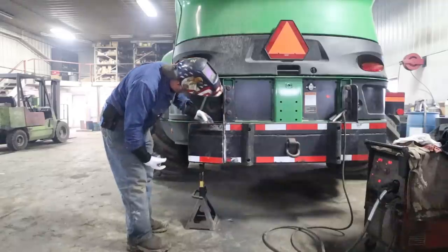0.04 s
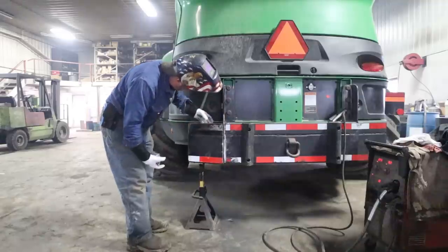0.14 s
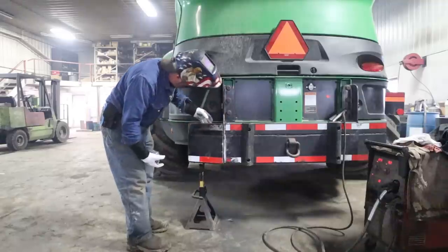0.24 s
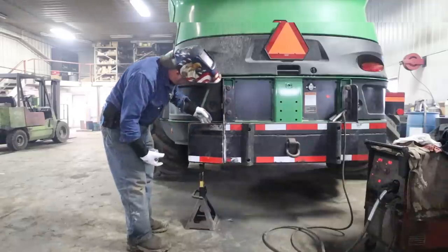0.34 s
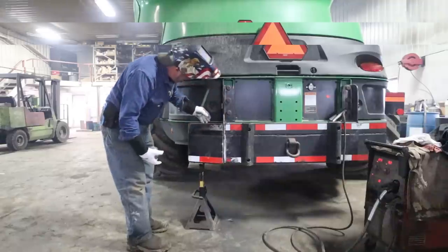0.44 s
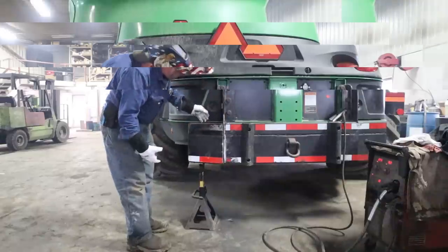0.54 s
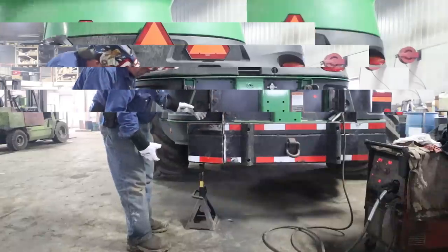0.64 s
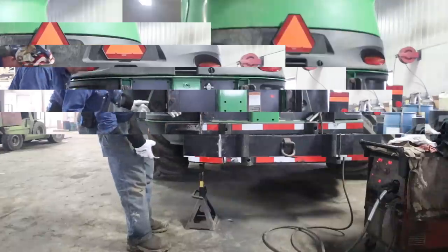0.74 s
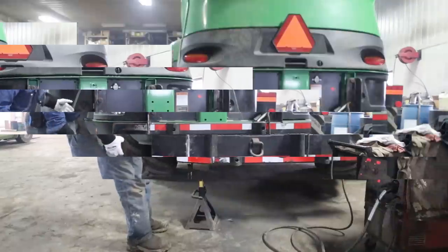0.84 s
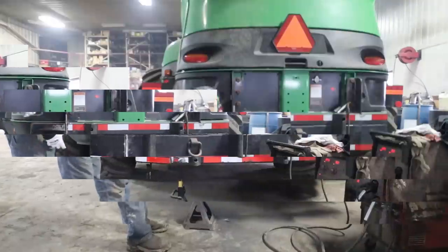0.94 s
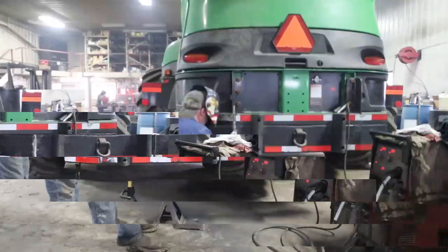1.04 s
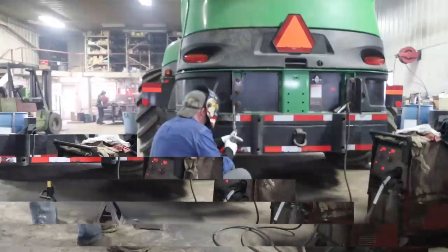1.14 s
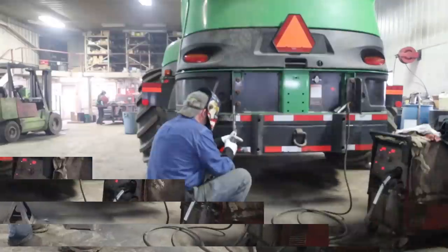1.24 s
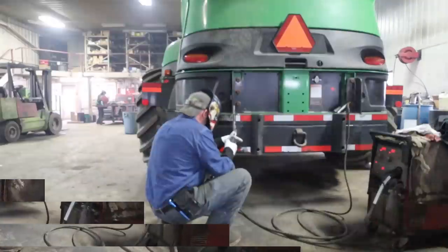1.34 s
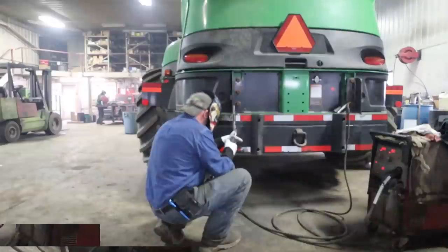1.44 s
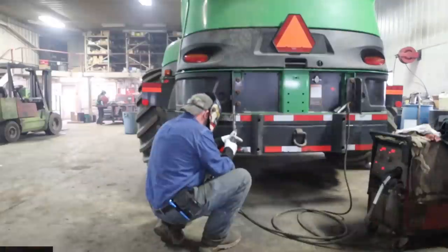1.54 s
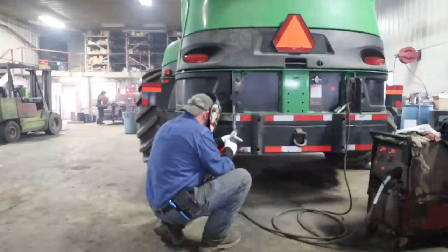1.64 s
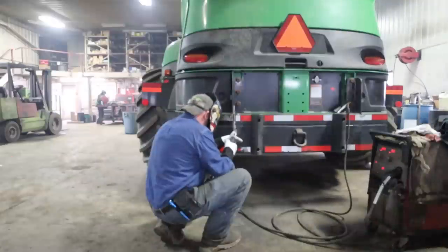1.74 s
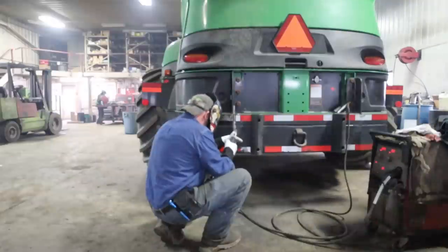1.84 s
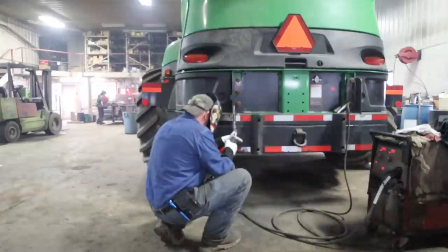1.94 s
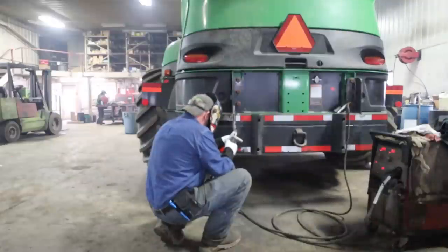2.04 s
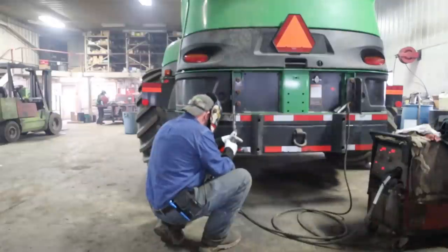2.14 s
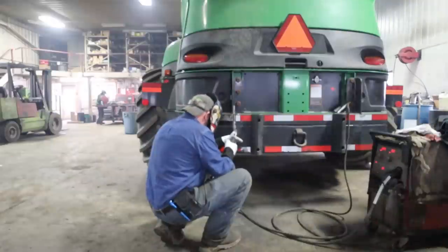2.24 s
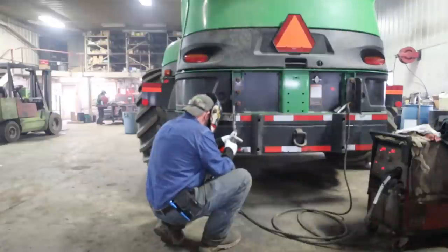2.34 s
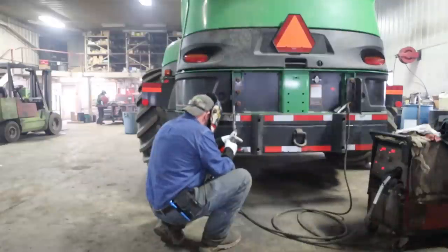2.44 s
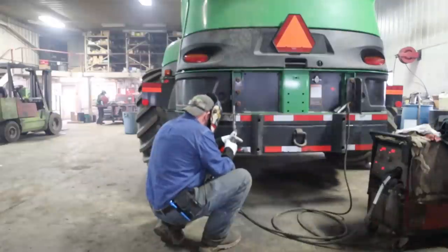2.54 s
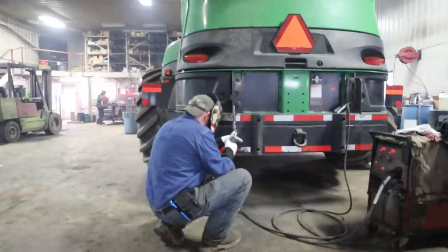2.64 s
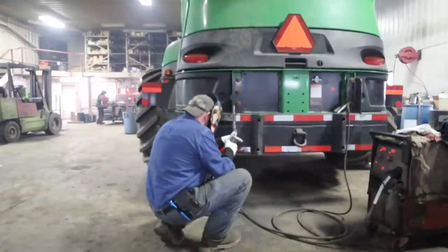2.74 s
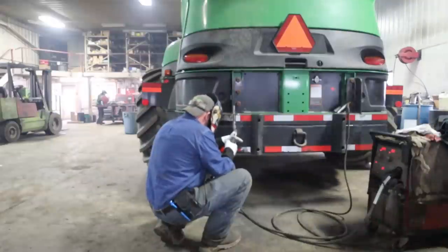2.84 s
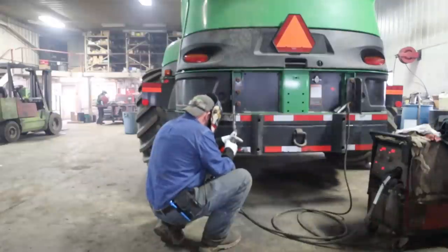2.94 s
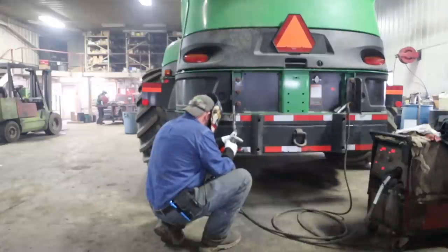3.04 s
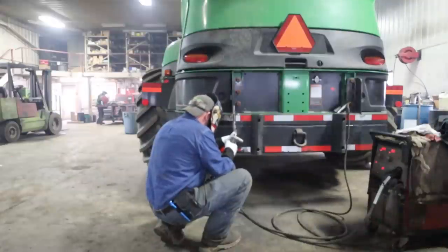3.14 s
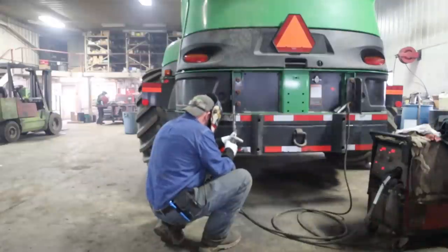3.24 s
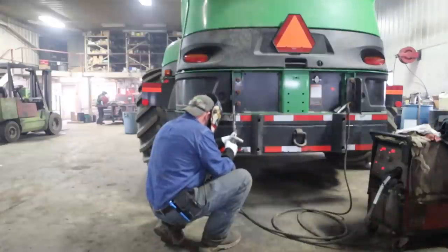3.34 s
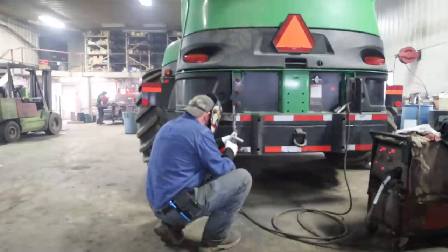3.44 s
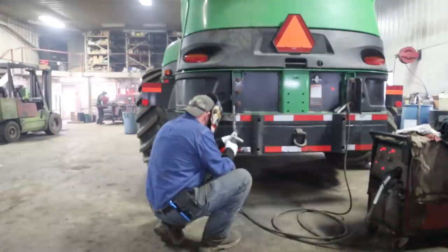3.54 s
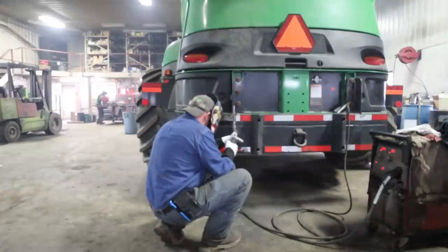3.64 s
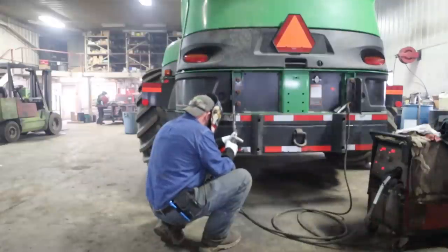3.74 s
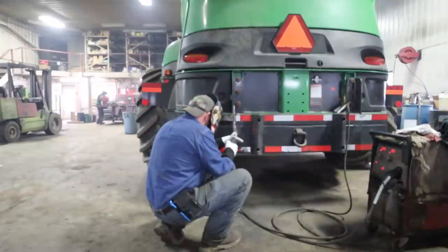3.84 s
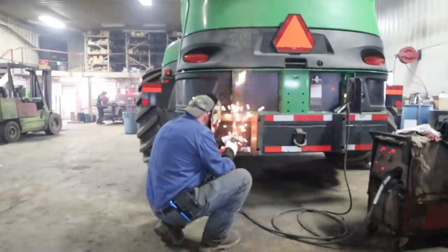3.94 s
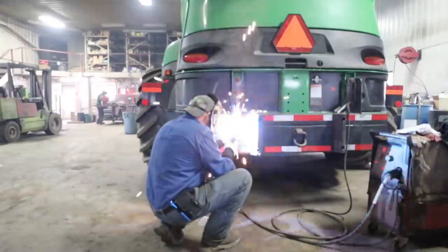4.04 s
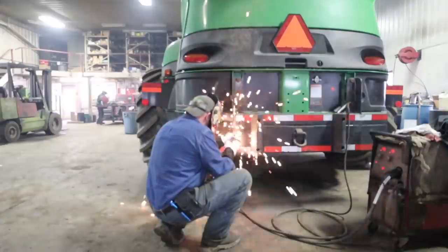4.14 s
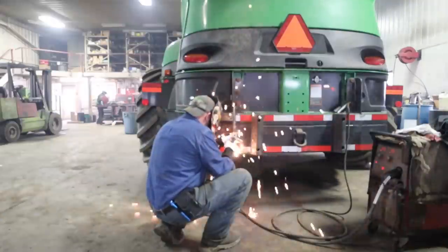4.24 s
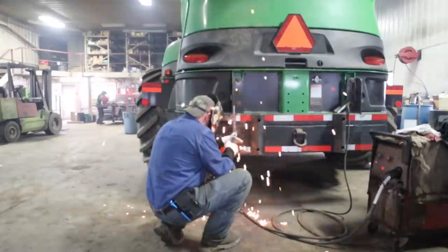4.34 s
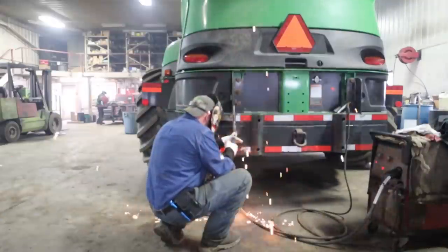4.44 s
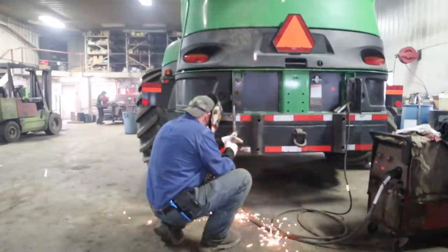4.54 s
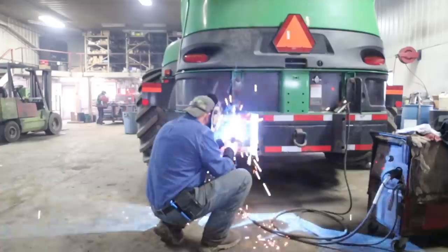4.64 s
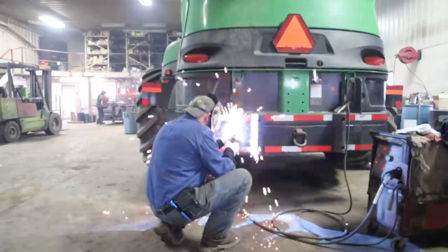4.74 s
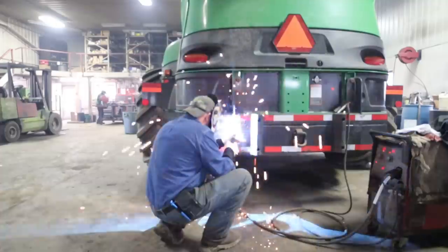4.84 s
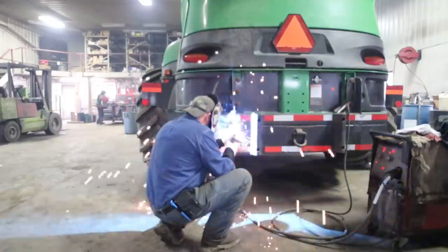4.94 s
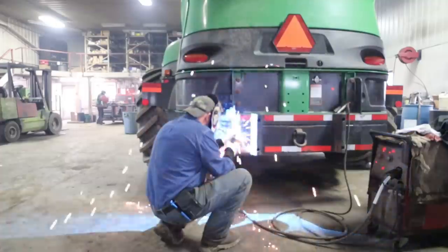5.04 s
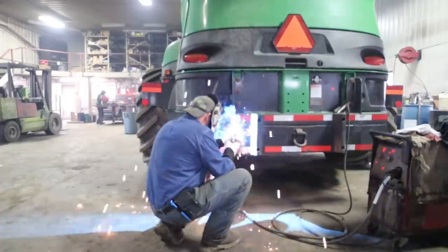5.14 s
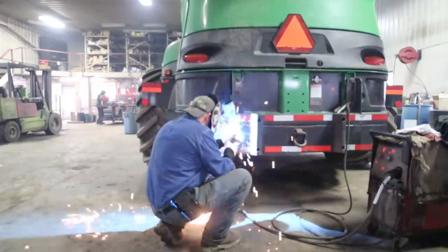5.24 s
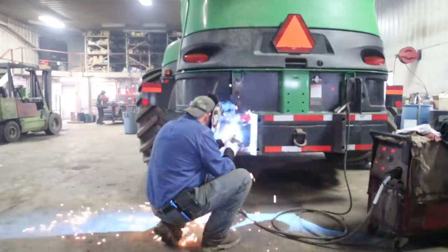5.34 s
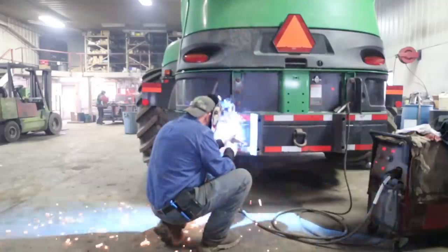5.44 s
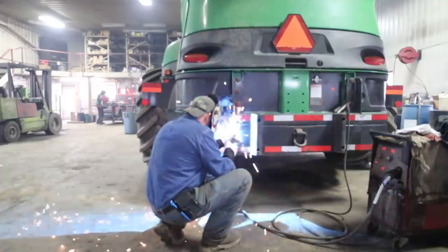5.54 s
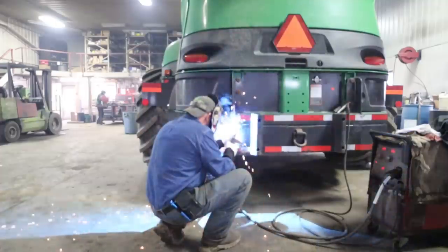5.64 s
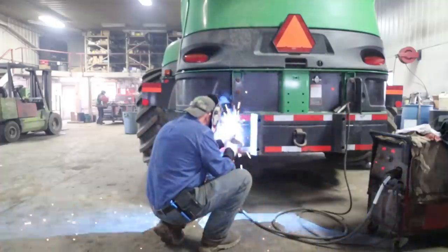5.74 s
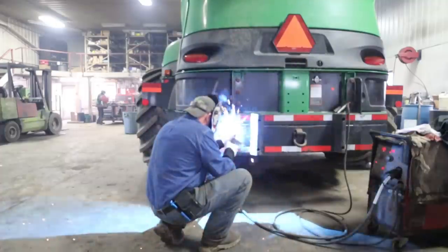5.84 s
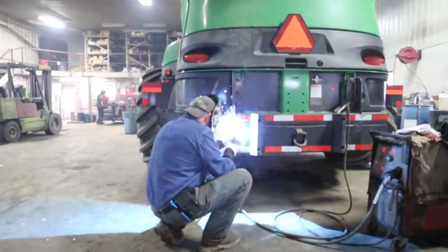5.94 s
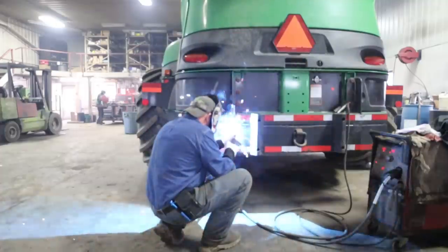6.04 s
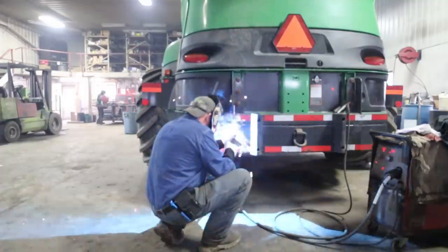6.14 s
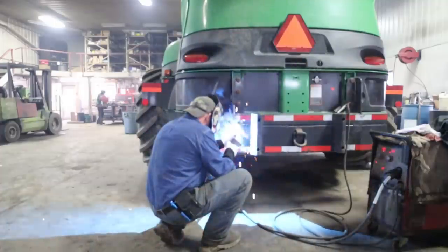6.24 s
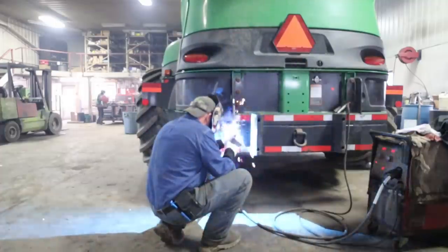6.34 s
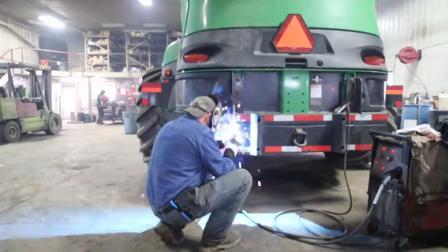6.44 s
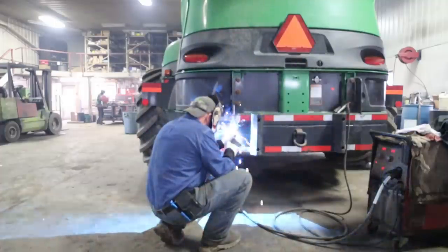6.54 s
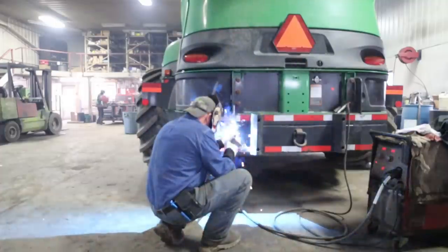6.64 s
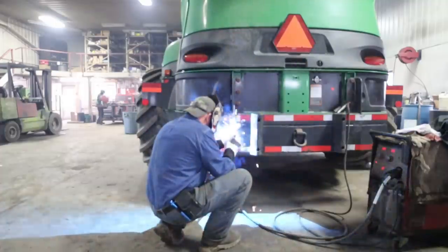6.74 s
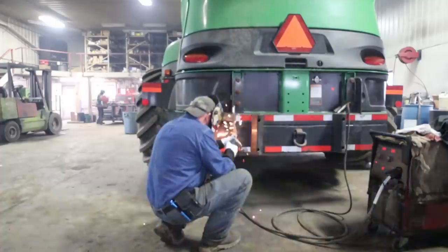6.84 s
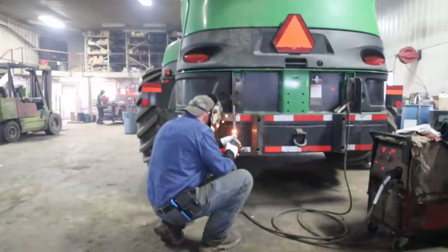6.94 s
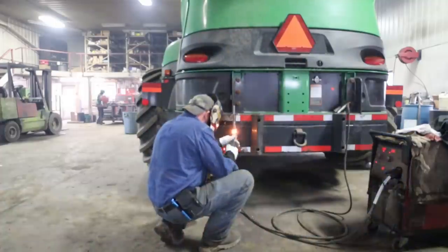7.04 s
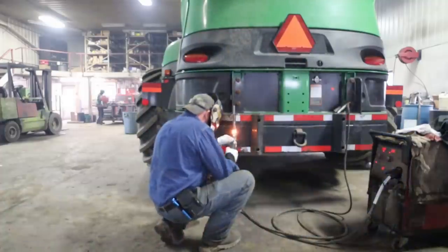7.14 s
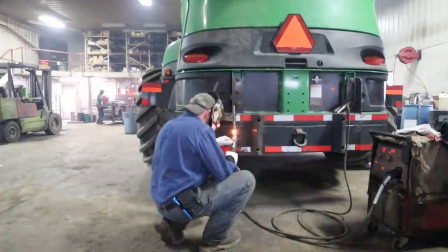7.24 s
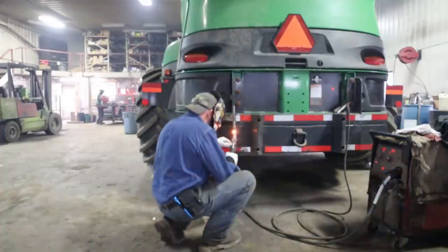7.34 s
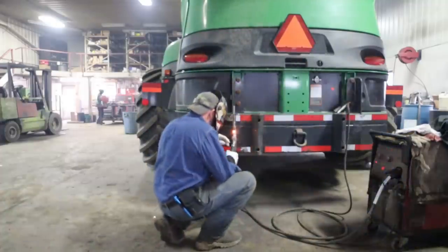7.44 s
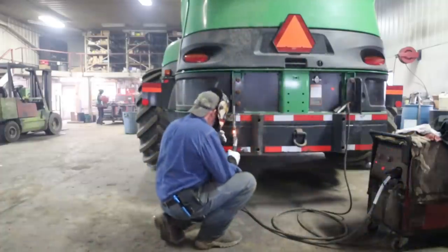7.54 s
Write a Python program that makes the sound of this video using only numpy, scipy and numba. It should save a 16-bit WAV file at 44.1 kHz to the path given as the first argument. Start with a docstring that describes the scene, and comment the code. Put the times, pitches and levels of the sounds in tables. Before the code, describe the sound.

An angle grinder rasps on steel from the start, bright and ringing, with a wavering gear whine and a faint low machine drone in the workshop. Around 1 second the grinding shifts smoothly in tone and grows a little louder as a low hum and rumble come in. A shrill, wavering tone sits on top from about 1.3 to 3 seconds. At 4 seconds a wire welder gives one hard pop and a quick sputter of smaller ones, then another hard pop near 4.7 seconds. From about 4.9 seconds the arc runs in a fast, uneven, sizzling crackle, with sharp, close snaps jumping out and a slight room echo. The loudest cracks briefly push the grinder down, and it fades steadily into the background. The arc stops at about 6.9 seconds, leaving the quieter grinding until the end, near 7.5 seconds.

```python
"""A steel workshop. An angle grinder rasps on ringing steel over gear whine and a low drone. Near 1 s
one grinding sound crossfades into another, and hum and rumble fade in with it; a shrill tone near 6.3 kHz
sounds from about 1.3 to 3 s. Near 4 s a wire welder pops on the cold joint, then its arc crackles for
two seconds at about a hundred short circuits a second. The sharp snaps ring the microphone, and the
loudest make its limiter duck the grinder."""
import sys
import numpy as np
from scipy import signal
from scipy.fft import rfft, irfft, next_fast_len
from scipy.io import wavfile
from scipy.ndimage import uniform_filter1d
from numba import njit

SR = 44100
rng = np.random.default_rng(int(sys.argv[2]) if len(sys.argv) > 2 else 0)


def digitize_waveform(pressure):
    """Quantize a signal to 16-bit integers and store it at the path in sys.argv[1].

    Rows of a 2-D input are taken as channels; values are limited to [-1, 1].
    """
    field = np.atleast_2d(pressure).T
    bounded = np.clip(field, -1, 1)
    quanta = np.round(bounded * 32767).astype(np.int16)
    wavfile.write(sys.argv[1], SR, quanta)


N = 334278
T = np.arange(N) / SR

# how hard the disc leans in, per grinding sound: t/s, pressure/dB, main ring's level over the pressure/dB
FIRST_PRESSURE = [(0.0, -21, 7.5), (0.26, -19, 6.5), (0.46, -20, 3), (0.54, -20, 6), (0.7, -22.5, 2.5),
                  (0.9, -25, 10), (1.1, -22, 3)]
SECOND_PRESSURE = [(0.85, -17.5, -13), (1.15, -18.5, 1), (1.4, -18.5, -5), (1.78, -16.5, 1.5),
                   (2.1, -18, -0.5), (2.45, -17.5, 1.5), (3.05, -18, -1.5), (3.28, -18.5, 3.5),
                   (3.97, -18, 1), (4.01, -20, 0), (4.47, -23.5, 3.5), (4.95, -24.5, -0.5), (5.6, -27, 2.5),
                   (5.95, -28.5, -2), (6.4, -29.5, 4), (6.9, -28, 0), (7.22, -28.5, 1), (7.48, -27, 1.5)]
# crossfade between the two grinding sounds: t/s, the second's share of the power/0-1
CROSSFADE = [(.55, 0), (.8, .15), (1.0, .55), (1.25, 1)]
# colour of grit tearing steel: f/Hz, level/dB
FIRST_GRIT = [(100, -24), (400, -18), (900, -14), (1700, -10), (2600, 1), (3600, 1), (4500, 4.5),
              (5700, -5.5), (7500, -19), (9400, -23), (12500, -36), (15500, -35)]
SECOND_GRIT = [(100, -37), (600, -12.5), (1100, -10), (1900, -4.5), (2500, -3), (3200, 0.5), (3650, -4),
               (4500, -1), (5600, -2.5), (6900, -7), (8200, -14), (9700, -29), (12500, -22.5), (15500, -48)]
# damped ring of the disc on the steel: f/Hz, width/Hz, level/dB
FIRST_DISC_MODES = [(2760, 11, -3), (3145, 14, -5), (3670, 69, -14), (4080, 24, -19), (4010, 27, -0.5),
                    (4875, 150, 0.5), (6350, 61, -6), (7150, 220, -7.5), (8600, 140, -16.5),
                    (10100, 150, -25), (11750, 150, -32), (13200, 230, -29), (14650, 150, -33)]
SECOND_DISC_MODES = [(2448, 50, -7.5), (2815, 48, -18), (4060, 19, -5.5), (4923, 86, 0), (6390, 60, -8),
                     (7450, 205, -10.5), (8873, 240, -14), (10340, 190, -20), (11800, 130, -24.5),
                     (13500, 300, -21.5), (14400, 34, -33), (14800, 130, -35)]
# narrow wavering tones, the grinder's gear and spindle whine and ringing steel: f/Hz, level/dB
FIRST_NARROW_TONES = [(2713, -7), (3068, -7), (3962, -8.5), (4107, -8), (4689, -6.5), (4780, -27),
                      (4858, -9), (6250, -16.5), (7138, -18)]
SECOND_NARROW_TONES = [(2350, -15), (2540, -20), (2691, -13.5), (2789, -12.5), (2966, -15), (3262, -14),
                       (3854, -14), (4000, -10), (4095, -19), (4790, -9), (4885, -15), (4921, -4),
                       (4948, -11.5), (6212, -14), (6282, -9), (7461, -12), (8839, -13)]
# hum of the unbalanced disc: multiple of the spindle rate, level/dB
HUM_HARMONICS = [(1, -7.5), (2, -11.5), (3, -8.5), (4, -4.5)]
# colour of the grinder's rumble through the hall: f/Hz, level/dB
RUMBLE_COLOUR = [(25, -39), (60, -13), (90, -6), (125, 2), (175, -2), (215, -3), (275, -0.5), (340, -3),
                 (420, 0), (520, -1), (620, -24), (1200, -21.5)]
# gear whine, sagging under load: t/s, f/Hz, level/dB
FIRST_GEAR_GLIDE = [(0.0, 2106, -37), (0.25, 2087, -37), (0.6, 1990, -40), (1.0, 1980, -77)]
SECOND_GEAR_GLIDE = [(1.0, 2786, -50), (1.2, 2885, -27), (1.5, 2945, -24.5), (1.9, 3000, -26),
                     (2.4, 2935, -30), (2.95, 2930, -25), (3.4, 2892, -29), (3.9, 2780, -29.5),
                     (4.3, 2856, -53), (7.5, 2965, -42)]
# partials of the whine: frequency ratio, level/dB
FIRST_GEAR_PARTIALS = [(0.22, -15), (1, 0.5)]
SECOND_GEAR_PARTIALS = [(0.797, -6.5), (1, 0.5), (1.1, -11)]
# low machine drone: t/s, f/Hz, level/dB
DRONE_GLIDE = [(0, 92.5, -51), (.35, 92, -45.5), (.8, 90, -49), (1.3, 88.3, -66), (4, 88.4, -55),
               (7.5, 89.25, -75)]
# the wire touches and blows apart: t/s, level/dB, spray decay/s
COLD_POPS = [(3.978, 12.5, .0024), (4.129, 7, 0.0034), (4.143, 7, 0.0027), (4.1533, 4, 0.0029),
             (4.18, 1, 0.0018), (4.6878, 12.5, .0014), (4.8334, 2, .0016), (4.8572, -2, 0.0028),
             (4.9462, -3, 0.0013)]
# colour of one pop or snap: f/Hz, level/dB
FRONT_COLOUR = [(25, -43), (110, -7), (180, -1.5), (320, -7), (420, 4), (650, 3), (790, 3), (1000, 4),
                (1270, -3.5), (1520, 1), (2000, 1), (3500, 3), (6000, 2.5), (9500, -1.5), (15000, -4.5)]
# band where a sharp front rings the microphone: low f/Hz, high f/Hz
MIC_BAND = [7185, 8195]
# slap off the steel around the joint: delay/s, gain
STEEL_ECHOES = [(.0019, 0.29), (.0023, -0.16), (.00325, .2), (.0046, 0.055)]
# ring of the welded part: f/Hz, t60/s, level/dB
JOINT_RING = [(437, 0.086, -43.5), (600, 0.04, -58), (1475, 0.03, -40)]
# pace of the running arc: t/s, short-circuit rate/Hz
ARC_PACE = [(4.92, 108), (5.13, 116), (5.3, 105), (5.519, 78.6), (5.7, 92), (5.93, 70), (6.05, 103),
            (6.35, 115), (6.905, 99)]
# accents that jump out of the crackle: t/s, level/dB
ARC_ACCENTS = [(4.9195, 4.5), (5.0176, 3), (5.0263, -1), (5.104, 0), (5.1451, -2), (5.5598, 4),
               (5.6923, 2.5), (5.7737, 2), (5.8775, 3), (5.9248, 0.5), (6.0105, 4), (6.0693, 2.5),
               (6.1554, 4.5), (6.253, -3), (6.7399, 3.5)]


def undb(db):
    """Decibels to gain."""
    return np.exp(np.asarray(db) * (np.log(10) / 20))


def unit(x):
    """Scale to rms 1."""
    return x / np.sqrt(np.mean(x ** 2))


def curves(table):
    """One automation curve for each value column of a time table."""
    times, *columns = np.transpose(table)
    return [np.interp(T, times, column) for column in columns]


def wobble(rate_hz):
    """Smooth random modulation at rms 1."""
    hold = max(int(SR / rate_hz), 1)
    steps = rng.standard_normal(8192)[np.arange(N) // hold % 8192]
    return unit(uniform_filter1d(uniform_filter1d(steps, hold), hold))


def eq_gains(colour, size):
    """A colour table as gains on the bins of an FFT."""
    hz, db = np.transpose(colour)
    return undb(np.interp(np.log(np.fft.rfftfreq(size, 1 / SR) + 1), np.log(hz), db))


def tint(x, colour):
    """EQ a signal to a colour, at rms 1."""
    size = next_fast_len(N)
    return unit(irfft(rfft(x, size) * eq_gains(colour, size), size)[:N])


def tone(hz, waver, fade_db):
    """A sine whose pitch wavers and whose level comes and goes."""
    phase = 2 * np.pi * np.cumsum(hz * (1 + waver * wobble(25))) / SR
    return np.sqrt(2) * np.sin(phase) * undb(fade_db * wobble(14))


def disc_on_steel(pressure, grit_colour, disc_modes, narrow_tones,
                  rasp_db, disc_db, tones_db, overtone_db, waver, flutter_db, grain_db):
    """Grit rasps, scraping rings the disc, and narrow tones waver on top; all ride the pressure."""
    pressure_db, main_db = curves(pressure)
    main_hz, main_width, _ = max(disc_modes, key=lambda mode: mode[2])
    registers = undb([pressure_db, pressure_db + main_db, pressure_db + overtone_db])

    def drive(hz):
        """Gain of a pitch's register: under, at or over the main ring."""
        return registers[np.searchsorted([.92, 1.1], hz / main_hz)]

    disc = 0
    for hz, width, db in disc_modes:
        scrape = rng.standard_normal(N) * undb(flutter_db * wobble(40))
        ring = unit(signal.lfilter(*signal.iirpeak(hz, hz / width, fs=SR), scrape))
        disc += drive(hz) * undb(db + disc_db) * np.sqrt(width / main_width) * ring
    tones = sum(drive(hz) * undb(db + tones_db) * tone(hz, waver, fade_db=3.5) for hz, db in narrow_tones)
    grit = tint(rng.standard_normal(N) * undb(grain_db * wobble(900)), grit_colour)
    chatter = undb(.5 * wobble(45))
    return chatter * (undb(pressure_db + rasp_db) * grit + disc + tones)


def grinding():
    """One grinding sound crossfades into another near 1 s, at equal power."""
    share, = curves(CROSSFADE)
    first = disc_on_steel(FIRST_PRESSURE, FIRST_GRIT, FIRST_DISC_MODES, FIRST_NARROW_TONES,
                          rasp_db=2, disc_db=-4.5, tones_db=-3, overtone_db=3.5,
                          waver=.00298, flutter_db=0, grain_db=.5)
    second = disc_on_steel(SECOND_PRESSURE, SECOND_GRIT, SECOND_DISC_MODES, SECOND_NARROW_TONES,
                           rasp_db=1, disc_db=-2.5, tones_db=-2, overtone_db=-.35,
                           waver=.003, flutter_db=1.5, grain_db=.97)
    return np.sqrt(1 - share) * first + np.sqrt(share) * second


def motor(spindle_hz=135.05, trim_db=-15.5, floor_db=-16, hum_db=-2, rumble_db=1):
    """The grinder's low end: unbalance hum and rumble fade in with the second grinding sound."""
    pressure_db, _ = curves(SECOND_PRESSURE)
    share, = curves(CROSSFADE)
    fade_in = np.sqrt(share + undb(floor_db) ** 2)
    hum = sum(undb(db) * tone(k * spindle_hz, waver=.0053, fade_db=2) for k, db in HUM_HARMONICS)
    rumble = tint(rng.standard_normal(N), RUMBLE_COLOUR)
    return fade_in * undb(pressure_db + trim_db) * (undb(hum_db) * hum + undb(rumble_db) * rumble)


def gear_whine(glide, partials, waver, fade_db):
    """Gear tones that sag and recover together with the motor speed."""
    hz, level_db = curves(glide)
    return undb(level_db) * sum(undb(db) * tone(ratio * hz, waver, fade_db) for ratio, db in partials)


def drone():
    """A machine in the hall lays a faint, low tone under everything."""
    hz, level_db = curves(DRONE_GLIDE)
    return undb(level_db) * tone(hz, waver=.0054, fade_db=1)


def shrill_tone(hz=6275, level_db=-25, start_s=1.25, end_s=3.05, ramp_s=.18):
    """A shrill, wavering tone swells, holds and dies away."""
    envelope = np.clip(np.minimum(T - start_s, end_s - T) / ramp_s, 0, 1)
    return undb(level_db) * envelope * tone(hz, waver=.005, fade_db=3)


def wire_pops(spray_db=-8, thump_db=5.5, thump_band_hz=(50, 520)):
    """Wire on the cold joint: each pop is a hard crack, a spray of metal and a thump of expanding gas."""
    cracks, blasts = np.zeros((2, N))
    age = np.arange(1024) / SR
    for at, db, decay_s in COLD_POPS:
        start = int(at * SR)
        burst = undb(spray_db) * rng.standard_normal(len(age)) * np.exp(-age / decay_s)
        burst[0] = 1  # the crack leads the spray
        cracks[start:start + len(age)] += undb(db) * burst
        blasts[start] += undb(db)
    response = snap_response(mic_db=12, joint_db=-11, near_db=-34, near_t60=.02, hall_db=-54)
    thump = signal.sosfilt(signal.butter(1, thump_band_hz, "bandpass", fs=SR, output="sos"), blasts)
    return signal.fftconvolve(cracks, response)[:N] - undb(thump_db) * thump


def snap_response(mic_db, joint_db, near_db, near_t60, hall_db, hall_t60=.5):
    """One steep pressure front with its tail: microphone ring, near reflections, hall and joint."""
    # minimum phase keeps the attack sharp
    size = 2048
    cepstrum = irfft(np.log(eq_gains(FRONT_COLOUR, size)))
    cepstrum[1:size // 2] *= 2
    cepstrum[size // 2 + 1:] = 0
    front = irfft(np.exp(rfft(cepstrum)))
    age = np.arange(SR // 2) / SR
    paths = signal.unit_impulse(len(age))
    mic_ring = signal.sosfilt(signal.butter(2, MIC_BAND, "bandpass", fs=SR, output="sos"), paths)
    for delay, gain in STEEL_ECHOES:
        paths[int(delay * SR)] += gain
    for db, t60 in ((near_db, near_t60), (hall_db, hall_t60)):
        paths += undb(db - 60 * age / t60) * rng.standard_normal(len(age))
    for hz, t60, db in JOINT_RING:
        paths += undb(db + joint_db - 60 * age / t60) * np.cos(2 * np.pi * hz * age)
    return -signal.fftconvolve(paths + undb(mic_db) * mic_ring, front)


def short_circuits(snap_db=-3, usual_wait_s=.0089, db_per_doubling=6.5, warming_db_per_s=-1.6,
                   wait_scatter=.13, scatter_db=2):
    """The wire keeps dipping into the pool; a longer wait melts a bigger drop, which snaps louder."""
    pulses = np.zeros(N)
    times, rates = np.transpose(ARC_PACE)
    accents, at = sorted(ARC_ACCENTS), times[0]
    for early, hard in rng.standard_normal((512, 2)):
        wait = np.exp(-wait_scatter * early) / np.interp(at, times, rates)
        if accents and accents[0][0] < at + 1.5 * wait:
            at, db = accents.pop(0)
        else:
            at += wait
            drop_db = db_per_doubling * np.log2(wait / usual_wait_s)
            warming_db = warming_db_per_s * (at - times[0])  # snaps soften as the joint heats up
            db = snap_db + drop_db + warming_db + scatter_db * hard
        if at > times[-1]:
            break
        pulses[int(at * SR)] = undb(db)
    return pulses


def spatter(pulses, sizzle_db=-31.5, linger_s=.0069, spread_db=3):
    """Tiny, very uneven bursts of molten metal sizzle after each snap."""
    envelope = signal.lfilter([1], [1, -np.exp(-1 / (linger_s * SR))], pulses)
    sizes = np.minimum(rng.exponential(size=N), 5)
    sizzle = unit(rng.standard_normal(N) * undb(spread_db * sizes))
    return undb(sizzle_db) * envelope * sizzle


def welding_arc(gain_db=3):
    """The running crackle: short circuits and their spatter ring the joint, hall and microphone."""
    pulses = short_circuits()
    crackle = pulses + spatter(pulses)
    response = snap_response(mic_db=13.5, joint_db=3.5, near_db=-26, near_t60=.017, hall_db=-37)
    return undb(gain_db) * signal.fftconvolve(crackle, response)[:N]


def scene():
    """Grinder, hall drone and welder in one mono mix."""
    grinder = grinding() + shrill_tone() + motor()
    grinder += gear_whine(FIRST_GEAR_GLIDE, FIRST_GEAR_PARTIALS, waver=.00394, fade_db=4)
    grinder += gear_whine(SECOND_GEAR_GLIDE, SECOND_GEAR_PARTIALS, waver=.007, fade_db=5.5)
    return (grinder + drone() + welding_arc() + wire_pops())[None]


@njit
def peak_follower(x, attack, release):
    """The limiter's detector climbs quickly toward each peak and sinks back slowly."""
    envelope, level = np.empty(len(x)), 0.
    for i in range(len(x)):
        level = max(level + attack * (abs(x[i]) - level), level * release)
        envelope[i] = level
    return envelope


def record(dry, attack_s=.00049, release_s=.071, threshold=.85, top_hz=15700):
    """A limiter ducks the mix after peaks, attacks that slip through clip, and the top is cut."""
    peak = peak_follower(dry[0], 1 - np.exp(-1 / (attack_s * SR)), np.exp(-1 / (release_s * SR)))
    ducked = dry / np.maximum(peak / threshold, 1)
    high_cut = signal.ellip(8, .2, 70, top_hz, fs=SR, output="sos")
    return signal.sosfilt(high_cut, np.clip(ducked, -1, 1))


dry = scene()
out = record(dry)
digitize_waveform(out)
```